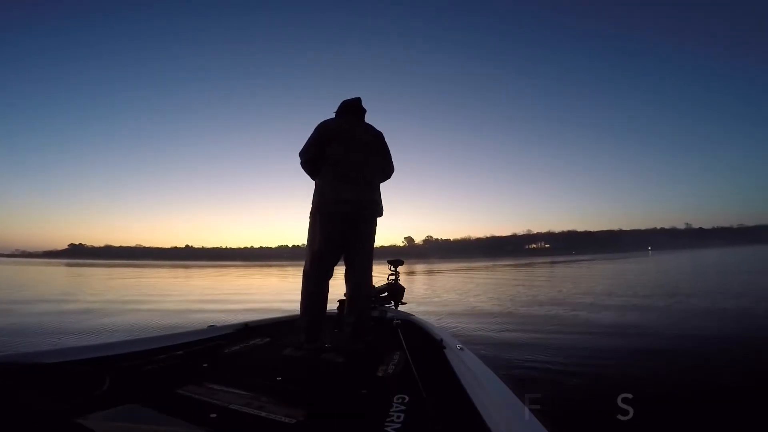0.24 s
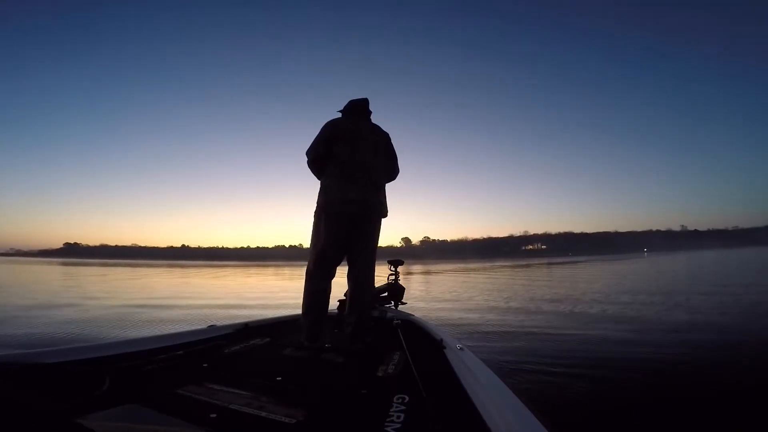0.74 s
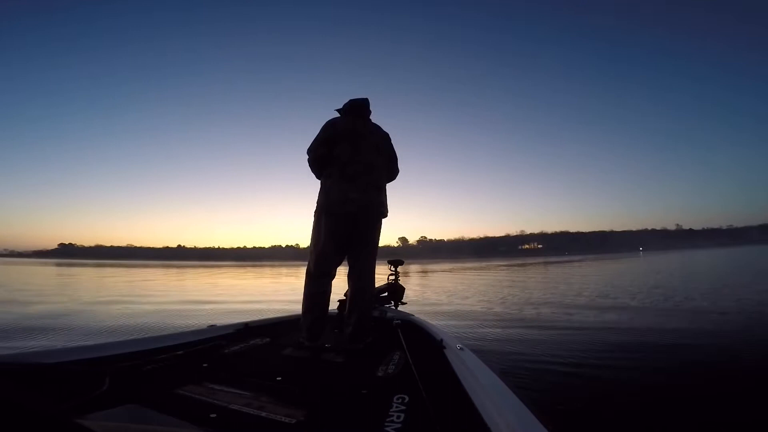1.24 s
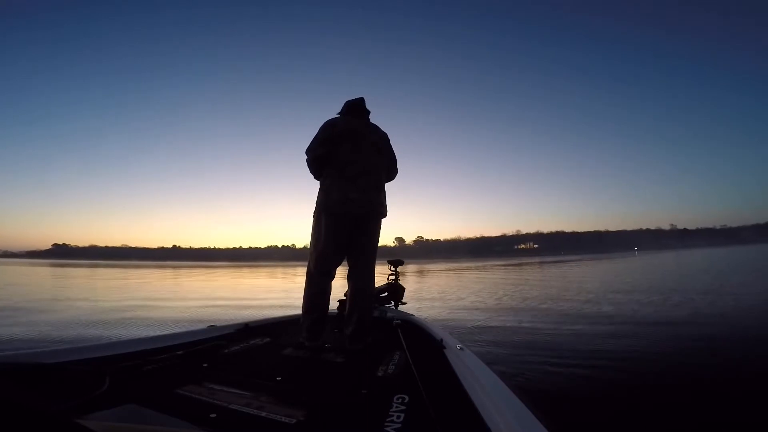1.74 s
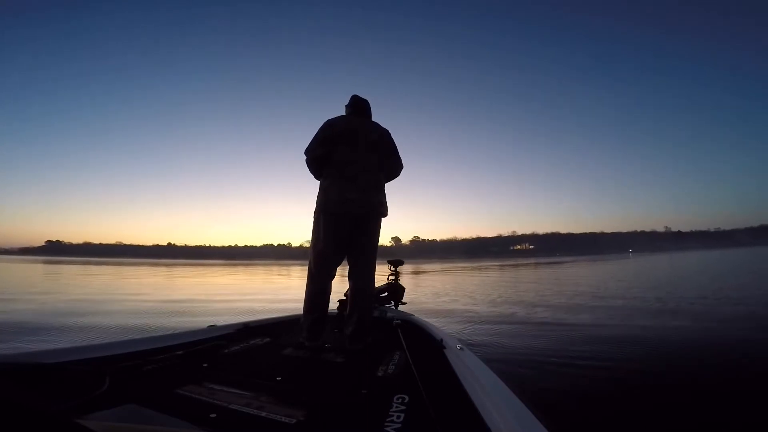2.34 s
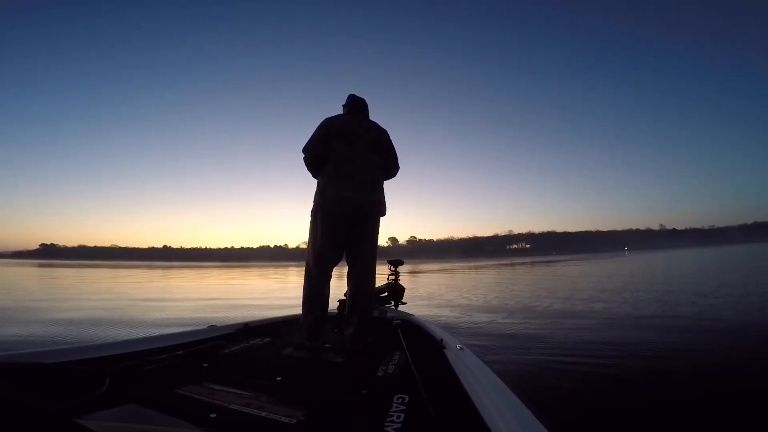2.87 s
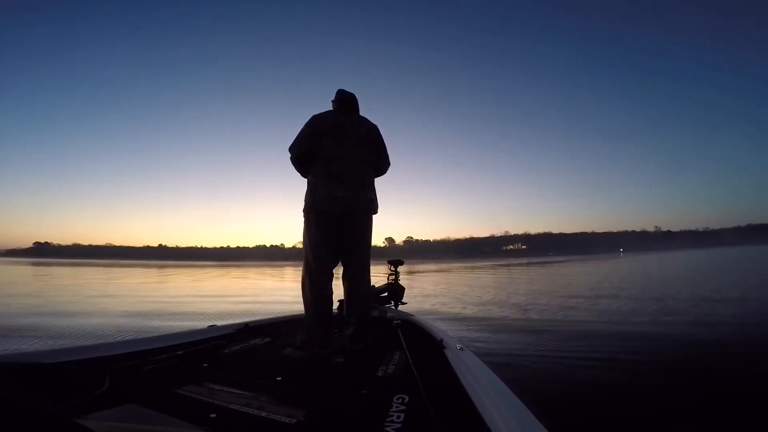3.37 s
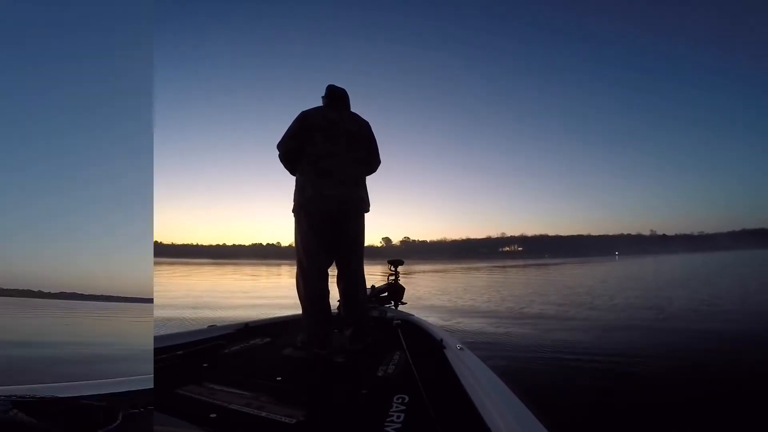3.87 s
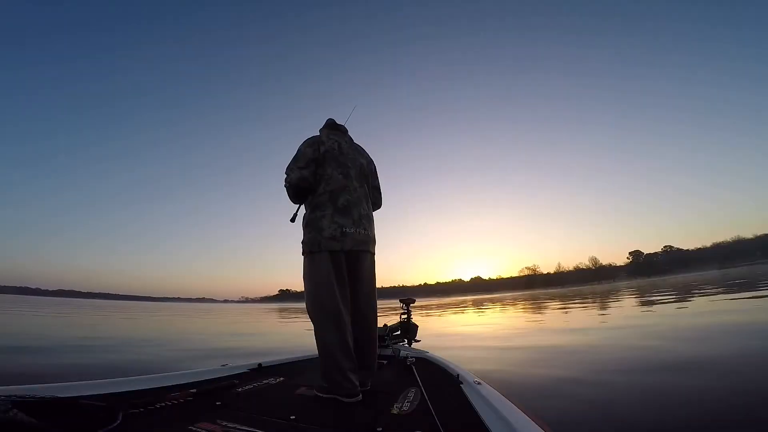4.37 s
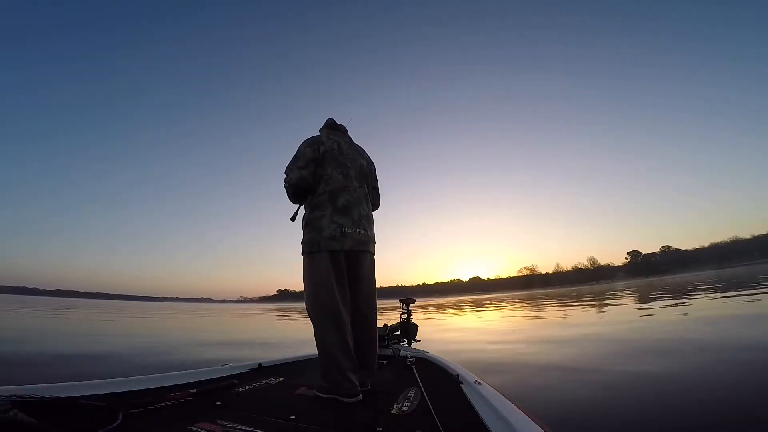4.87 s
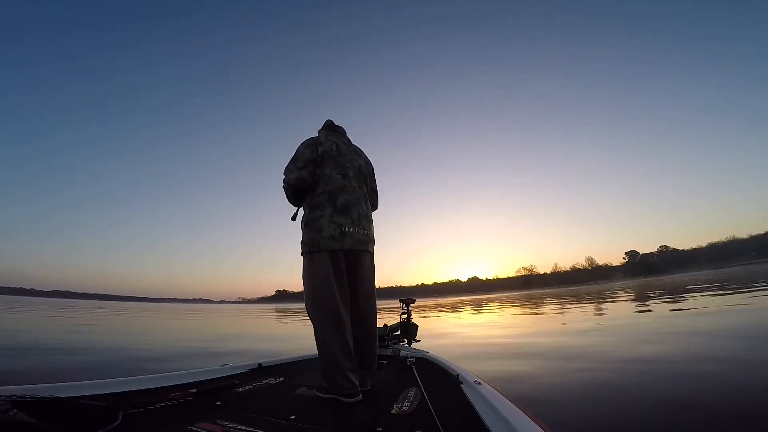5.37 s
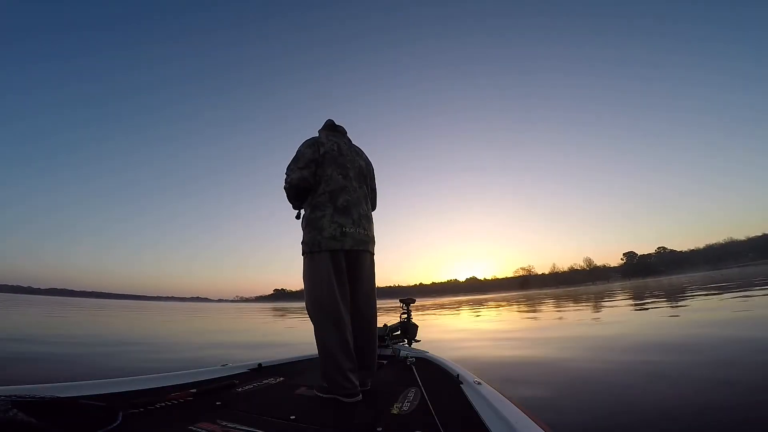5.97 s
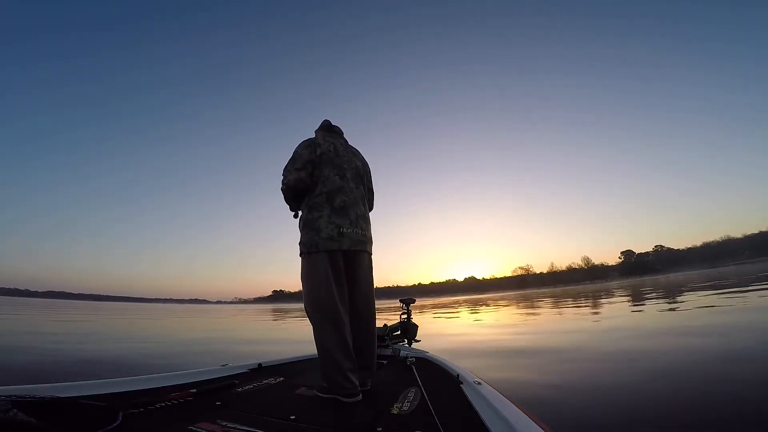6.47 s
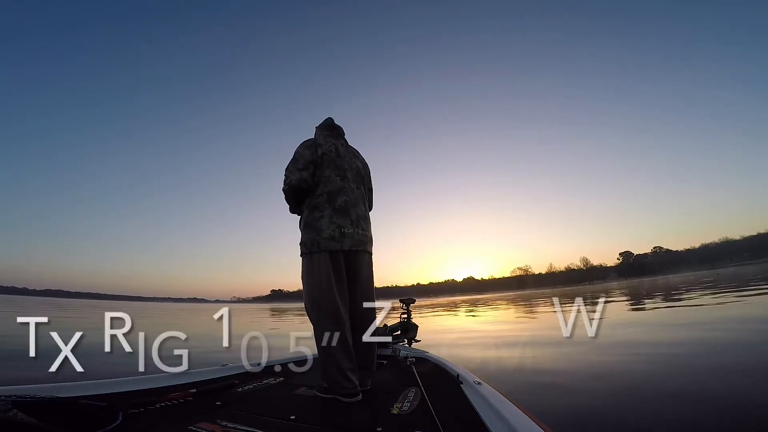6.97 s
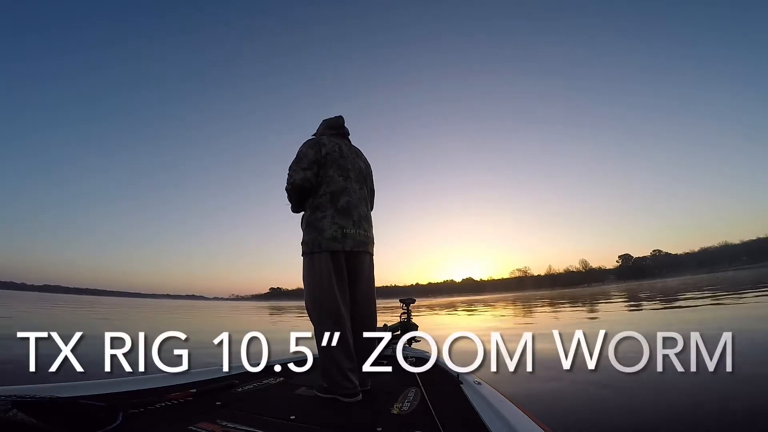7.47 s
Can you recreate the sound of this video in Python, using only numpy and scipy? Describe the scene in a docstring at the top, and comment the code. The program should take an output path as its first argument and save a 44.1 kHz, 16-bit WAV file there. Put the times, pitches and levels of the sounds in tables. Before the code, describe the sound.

An outdoor microphone on a boat picks up birds echoing from shoreline trees, soft air hiss and bumpy low wind gusts. Regular downward whistles, chips and upward sweeps fill the first part, with a few dull knocks and brief squeaks. The middle grows quiet, with an evenly repeated tiny chip and thin piping. The background then returns quickly with long arched whistles and stronger wind.

```python
"""Birds at dawn on a calm lake

Heard from a small boat: songbirds on the wooded shore, made of bending tones with scattered echoes.
A far chorus blurs many such notes; shaped noise makes the hiss and the rumble of wind on the microphone.
A faint hum is wavering tones, two squeaks are short rich tones and soft knocks are quickly dying tones.
Near the middle the background sinks into a quiet spell with sparser, softer song. Later the level
dips for an instant and the background comes back."""
import sys
import numpy as np
from scipy import signal
from scipy.fft import rfft, irfft, next_fast_len
from scipy.io import wavfile
from scipy.ndimage import uniform_filter1d

SR = 44100
rng = np.random.default_rng(int(sys.argv[2]) if len(sys.argv) > 2 else 0)


def store_pcm(level_fs):
    """Save levels as 16-bit WAV."""
    pcm = np.round(np.clip(level_fs, -1, 1) * 32767).astype(np.int16)
    wavfile.write(sys.argv[1], SR, np.atleast_2d(pcm).T)


N = 340011  # length [samples]
TIME = np.arange(N) / SR

# the air's hiss and murmur, early and late: (frequency [Hz], relative level [dB])
AIR_EARLY = [(20, 16), (70, 18.5), (130, 14), (200, 6.5), (300, 1), (450, -3), (730, -4), (1250, -9),
             (1800, -9), (2400, -7), (3000, -11), (4500, -13.5), (8000, -19), (15000, -23.5)]
AIR_LATE = [(20, 16), (70, 19), (130, 17), (200, 7), (300, 0.5), (450, -2), (800, -6), (1300, -8.5),
            (2300, -10.5), (3200, -12), (4500, -13.5), (8000, -19), (15000, -23.5)]
# wavering hum tones, early and late: (pitch [Hz], pitch wander [Hz], level above AIR_DB [dB])
HUM_EARLY = [(132.9, 12, 6.5), (247, 4.1, 1.5), (275.4, 3.9, -3.5)]
HUM_LATE = [(72.7, 3.04, 13), (101.4, 8, 11), (178.7, 6.6, 2), (238.1, 4.02, 5.5), (295.6, 5.25, -10.5)]
# color of the wind rumble: (frequency [Hz], relative level [dB])
WIND_SPECTRUM = [(10, 3), (22, 0.5), (32, 7), (50, -4.5), (75, -9.5), (110, -20), (170, -40), (300, -42.5),
                 (800, -74), (4000, -100)]
# gusts on the microphone: (time of the height [s], length [s], level [dB])
GUSTS = [(0.172, 0.045, -31), (0.367, 0.11, -32), (0.568, 0.044, -27), (0.795, 0.039, -29.5),
         (1.01, 0.06, -26.5), (1.125, 0.091, -23), (1.282, .15, -24), (1.489, 0.074, -23.5),
         (1.639, 0.044, -19.5), (1.745, 0.12, -24.5), (2.01, .1, -31), (2.284, .18, -32),
         (2.65, 0.087, -32), (2.745, .06, -32), (2.987, 0.073, -26.5), (3.772, 0.17, -33),
         (4.347, 0.11, -39.5), (5.757, 0.03, -38), (6.128, 0.036, -39), (6.727, 0.032, -29.5),
         (7.1, 0.17, -29), (7.306, 0.035, -20.5), (7.464, 0.15, -23), (7.656, 0.051, -28)]
# soft knocks on the hull: (time [s], pitch [Hz], level [dB], time to die by 60 dB [s])
KNOCKS = [(.283, 474, -50, .06), (1.607, 151, -26, 0.052), (3.099, 328, -36, 0.05),
          (3.655, 717, -45.5, 0.057)]
# short squeaks on the boat: (time [s], pitch [Hz], level [dB])
SQUEAKS = [(0.9076, 796, -40.5), (3.4829, 800, -40.5)]
# overtones of a squeak: (multiple of its pitch, relative level [dB])
SQUEAK_TONE = [(1, -0.5), (2, -2.5), (3, -3), (4, -13), (5, -16)]
# bend of each kind of note, evenly spaced from start to end: (distance from its pitch [semitones])
SLUR_BEND = [-0.2, -1.0, -3.0, -4.5, -6]
CHIP_BEND = [-2.01, -0.383, 0.14]
DROP_BEND = [0, -2.2, -7]
ARCH_BEND = [-0.993, 0, -0.1, -0.5, -0.9, -1.4]
SWEEP_BEND = [-9, -8, -4.5, 1]
# falling slurs (the main song), rising chips, steep drops, upward sweeps and arched whistles:
# (time [s], length [s], pitch [Hz], level [dB])
SLURS = [(.442, 0.12, 2545, -56.5), (.955, .125, 2506, -57), (1.418, 0.13, 2486, -56),
         (1.87, .118, 2550, -54), (2.303, .115, 2384, -55.5), (2.335, .105, 2490, -56),
         (2.718, .118, 2410, -56.5), (2.8, 0.1, 2546, -56.5), (3.11, 0.11, 2436, -57.5),
         (3.515, .13, 2350, -62), (3.925, .12, 2370, -67)]
CHIPS = [(1.11, 0.044, 2480, -57.5), (1.635, 0.05, 3130, -60), (2.04, 0.076, 3080, -61),
         (1.848, 0.037, 2540, -58), (3.515, .035, 2820, -58), (3.886, .022, 3020, -61.5),
         (4.035, 0.052, 2370, -66), (4.415, 0.046, 1820, -74), (4.68, .045, 3090, -74),
         (4.832, .035, 2830, -73), (5.11, .06, 2880, -75), (5.153, .054, 2105, -68.5),
         (5.402, .024, 2770, -71), (5.402, .025, 2090, -73), (5.685, 0.027, 2780, -70),
         (5.985, .024, 2780, -68), (6.841, .03, 2420, -56), (6.974, .024, 4770, -62),
         (6.976, 0.042, 3310, -59), (7.255, 0.021, 2340, -58), (7.66, 0.023, 2430, -58)]
DROPS = [(.325, .04, 2730, -57.5), (4.215, 0.063, 3950, -74), (4.262, .024, 3200, -69),
         (4.575, .075, 3970, -76), (6.228, .065, 2900, -73), (7.24, 0.021, 3100, -58),
         (7.638, 0.021, 3220, -58)]
SWEEPS = [(2.745, 0.09, 3450, -61), (3.005, .1, 3250, -60), (3.27, .1, 3430, -59.5), (3.51, .11, 3130, -62),
          (3.745, .12, 3070, -67)]
ARCHES = [(.22, 0.075, 2520, -56.5), (3.335, 0.097, 2470, -59), (3.54, 0.13, 2435, -58),
          (3.775, .07, 2460, -59), (4.005, .06, 2780, -68), (4.998, .27, 3236, -69),
          (6.978, 0.29, 3300, -61.5), (7.015, .26, 2505, -61), (7.25, 0.28, 3660, -63.5)]
# one small low chip sung in a row: (first time [s], length [s], pitch [Hz], level [dB])
CHIP_RUN = (4.182, 0.02, 2360, -72)
# piping notes: (time [s], length [s], pitch [Hz], level [dB], starting offset in pitch [semitones])
PIPES = [(0.659, 0.068, 2420, -63, 0), (3.013, .037, 3370, -59, 0.5), (3.15, .17, 3830, -65, -0.5),
         (5.405, .078, 3660, -68, 3), (5.53, 0.1, 3135, -68.5, .4), (5.703, 0.034, 2310, -66.5, 0),
         (6.275, .06, 1880, -72, 2.4), (6.373, 0.11, 2810, -67.5, 2), (6.48, .048, 2786, -63, 0.7),
         (6.676, .032, 2880, -63, 2), (6.73, .04, 3020, -63, 2), (6.914, 0.057, 1535, -63, 0),
         (7.564, 0.033, 1690, -59, 0)]
# a rolling phrase of five notes:
# (delay [s], length [s], start [Hz], middle [Hz], end [Hz], level relative to the phrase [dB])
PHRASE = [(0, 0.021, 2845, 2520, 2250, -2.5), (0.036, 0.028, 2660, 2786, 2880, 0),
          (0.09, .072, 2180, 2043, 1860, -7.5), (.226, .032, 2190, 2430, 2650, -5),
          (0.284, .042, 3374, 3290, 2850, -3)]
# each singing of that phrase: (time [s], level [dB])
PHRASES = [(1.622, -55.5), (2.02, -53), (2.415, -52.5), (2.81, -58.5)]
# the brief dip in level: (time [s], half width [s], depth [dB])
DIP = (6.471, 0.0086, -24)

AIR_DB, BREEZE_DB = -59.5, -38  # base levels of the background and of the light breeze
CHANGE_S, CHANGE_TAKES_S = 4.05, 0.33  # middle and length of the fade from early to late background
SINK_S, SINK_TAKES_S = 3.76, 0.45  # the quiet spell sets in
LIFT_S, LIFT_TAKES_S = 6.475, 0.099  # the quiet spell lifts
CHIP_PERIOD_S = 0.127  # from one chip of the run to the next
SLIDE_S = 0.018  # time constant of a piping note settling onto its pitch
ARCH_FADE_DB = -5  # arched whistles start strong and fade by this much
EDGE_HZ = 15350  # upper limit of the sound


def gain_of(db):
    """Turns decibels into a factor on the sound wave."""
    return 10 ** (np.asarray(db) / 20)


def evened(x):
    """Scales a sound to an average strength (rms) of 1."""
    return x / np.sqrt(np.mean(x ** 2) + 1e-20)


def read(points, hz):
    """Reads a spectrum, joining its points by straight lines over log frequency."""
    f, value = np.transpose(points)
    return np.interp(np.log(hz + 1), np.log(f + 1), value)


def add(mix, s, sound):
    """Mixes a sound in at time s."""
    part = mix[max(round(s * SR), 0):][:len(sound)]
    part += sound[:len(part)]


def noise(shape):
    """Noise of rms 1, colored by multiplying each frequency by shape(Hz)."""
    size = next_fast_len(N)
    spectrum = rfft(rng.standard_normal(size))
    colored = irfft(spectrum * shape(np.fft.rfftfreq(size, 1 / SR)), size)
    return evened(colored[:N])


def drift(rate_hz):
    """A random wander of rms 1, with little movement faster than about rate_hz."""
    return noise(lambda f: np.exp(-(f / rate_hz) ** 2))


def whistle(length, pitches, waver, edge=0.00727):
    """A nearly pure tone that bends smoothly through evenly spaced pitches, with soft ends."""
    t = np.arange(-edge / 2, length + edge / 2, 1 / SR)
    places = np.linspace(0, 1, len(pitches))
    curve = np.polyfit(places, pitches, len(pitches) - 1)
    hz = np.polyval(curve, t / length)
    turns = np.cumsum(hz * (1 + waver[:len(t)])) / SR
    swell = signal.windows.tukey(len(t), min(1, 0.082 + 1.5 * edge / length))
    return np.sqrt(2) * swell * np.sin(2 * np.pi * turns)


def shore(x, t60, delay=0.012):
    """Trees on the shore scatter sound into many random echoes that die by 60 dB in t60 seconds."""
    t = np.arange(SR) / SR
    hits = rng.random(SR) < 2000 / SR  # about 2000 echoes a second
    taps = rng.standard_normal(SR) * hits * (t > delay)
    tail = taps * gain_of(-60 * t / t60)
    return signal.fftconvolve(x, tail / np.linalg.norm(tail))[:N]


def spell(depth_db):
    """Gain of a background layer: it sinks slowly into the quiet spell and returns quickly."""
    sinking = np.clip((TIME - SINK_S) / SINK_TAKES_S, 0, 1)
    lifting = np.clip((TIME - LIFT_S) / LIFT_TAKES_S, 0, 1)
    return gain_of(depth_db * (sinking - lifting))


def air(spectrum, level_db, patchy_db):
    """Wide hiss with a low murmur: noise whose strength varies in faint patches of time and pitch."""
    hz, _, z = signal.stft(rng.standard_normal(N), SR, nperseg=2048, noverlap=1536)
    patches = uniform_filter1d(rng.standard_normal(z.shape), size=20, axis=0)
    patches = evened(uniform_filter1d(patches, size=8, axis=1))
    z = z * gain_of(read(spectrum, hz)[:, None] + patchy_db * patches)
    hiss = signal.istft(z, nperseg=2048, noverlap=1536)[1][:N]
    return gain_of(level_db) * evened(hiss)


def hum(lines, waver=0.22):
    """Faint motor-like tones that waver in pitch and strength."""
    out = np.zeros(N)
    for hz, width, db in lines:
        turns = np.cumsum(hz + width / 2 * drift(4.81)) / SR
        tone = (1 + waver * drift(2.7)) * np.sin(2 * np.pi * turns)
        out += gain_of(db) * evened(tone)
    return out


def chorus(centre_hz, spread, glide, level_db, count):
    """Many far birds: short arched or gliding notes, blurred together by the woods."""
    song, wander = np.zeros(N), 0.011 * drift(120)
    for k, (when, long, size, pitch, slope) in enumerate(rng.random((count, 5))):
        hz = centre_hz * (1 + spread * (2 * pitch - 1))
        bend = glide * (2 * slope - 0.8)
        pitches = [hz * (0.97 + bend), hz, hz * (0.97 - bend)]
        note = whistle(0.02485 + 0.05 * long, pitches, wander)
        start = (k + when) / count * N / SR  # one note at random in each equal slice of time
        add(song, start, gain_of(5 * size) * note)
    return gain_of(level_db) * evened(song + 0.8 * shore(song, t60=0.4))


def wind(steady_s=0.075, fickle_db=2.0):
    """Eddies buffet the microphone: a fickle light breeze, with gusts that swell and die away."""
    eddies = noise(lambda f: gain_of(read(WIND_SPECTRUM, f)) * (1 - np.exp(-(f / 12) ** 2)))
    # level out the eddies, so that breeze and gusts set their strength
    power = uniform_filter1d(eddies ** 2, size=round(steady_s * SR))
    eddies = eddies / np.sqrt(power + 1e-9)
    breeze = gain_of(BREEZE_DB + fickle_db * drift(10)) * spell(depth_db=-16.5)
    gust_power = np.zeros(N)
    for s, length, db in GUSTS:
        gust_power += gain_of(db) ** 2 * np.exp(-(2 * (TIME - s) / length) ** 2)
    return np.sqrt(breeze ** 2 + gust_power) * eddies


def knocks(rise=0.004):
    """Dull thuds of the hull: low to middling tones that die away quickly."""
    out, t = np.zeros(N), np.arange(SR // 4) / SR
    for s, hz, db, t60 in KNOCKS:
        swell = 1 - np.exp(-(t / rise) ** 2)
        add(out, s, gain_of(db - 60 * t / t60) * swell * 2 * np.sin(2 * np.pi * hz * t))
    return out


def squeaks(hold=0.012, rise=0.00028):
    """A few quick, even cycles rich in overtones that stop almost at once."""
    out, t = np.zeros(N), np.arange(SR // 30) / SR
    swell = (1 - np.exp(-t / rise)) * np.exp(-(t / hold) ** 4)
    for s, hz, db in SQUEAKS:
        tone = sum(gain_of(part_db) * np.cos(2 * np.pi * multiple * hz * t)
                   for multiple, part_db in SQUEAK_TONE)
        add(out, s, gain_of(db) * evened(tone) * swell)
    return out


def repeated(first, length, hz, db, count):
    """One chip sung again and again at an even pace."""
    return [(first + k * CHIP_PERIOD_S, length, hz, db) for k in range(count)]


def notes():
    """Every nearer note as (time [s], length [s], pitches [Hz], level [dB], fade [dB]), bent by its kind."""
    kinds = [(SLURS, SLUR_BEND, 0), (CHIPS, CHIP_BEND, 0), (repeated(*CHIP_RUN, count=8), CHIP_BEND, 0),
             (DROPS, DROP_BEND, 0), (SWEEPS, SWEEP_BEND, 0), (ARCHES, ARCH_BEND, ARCH_FADE_DB)]
    for rows, bend, fade_db in kinds:
        for s, length, hz, db in rows:
            yield s, length, hz * 2 ** (np.array(bend) / 12), db, fade_db
    for s, length, hz, db, slide in PIPES:
        bend = slide * np.exp(-np.linspace(0, length, 7) / SLIDE_S)
        yield s, length, hz * 2 ** (bend / 12), db, 0
    for s, db in PHRASES:
        for delay, length, *pitches, note_db in PHRASE:
            yield s + delay, length, pitches, db + note_db, 0


def birds(waver=0.0053, flutter_db=1.64, near_echo_db=-12, far_echo_db=-11.0):
    """Nearer singers: the long path over water makes notes flutter; branches and woods echo them."""
    song, wander = np.zeros(N), waver * drift(140)
    for s, length, pitches, db, fade_db in notes():
        note = whistle(length, pitches, np.roll(wander, -round(s * SR)))
        fade = np.linspace(0, fade_db, len(note))
        add(song, s - 0.003, gain_of(db + fade) * note)  # a little early, for the soft start
    song *= gain_of(flutter_db * drift(55))
    branches = shore(song, t60=0.045, delay=0.0037)
    woods = shore(song, t60=0.84, delay=0.028)
    return song + gain_of(near_echo_db) * branches + gain_of(far_echo_db) * woods


def scene():
    """Air, far chorus and hum change color and sink for a while; wind, boat sounds and birds join them."""
    change = np.clip((TIME - CHANGE_S) / CHANGE_TAKES_S + 0.5, 0, 1)
    early, late = np.sqrt(1 - change), np.sqrt(change)
    # each far chorus joins a narrow band of pitches with a wide one
    far_early = (chorus(2450, 0.0422, 0.038, level_db=-13.5, count=110)
                 + chorus(2150, 0.3, 0.1676, level_db=-5.5, count=170))
    far_late = (chorus(2330, 0.033, 0.06, level_db=-16, count=50)
                + chorus(2700, 0.36, 0.157, level_db=-4.0, count=150))
    air_early = air(AIR_EARLY, level_db=17.0, patchy_db=1.0)
    air_late = air(AIR_LATE, level_db=17.0, patchy_db=0.96)
    open_air = early * (air_early + far_early) + late * (air_late + far_late)
    drone = early * hum(HUM_EARLY) + late * hum(HUM_LATE)
    background = gain_of(AIR_DB) * (spell(depth_db=-11.5) * open_air + spell(depth_db=-14) * drone)
    return (background + wind() + knocks() + squeaks() + birds())[None]


def record(dry):
    """The level dips briefly; then a filter removes what lies above the upper limit."""
    s, width, db = DIP
    dip = gain_of(db / (1 + ((TIME - s) / width) ** 2))
    low_pass = signal.firwin(801, EDGE_HZ, window=("kaiser", 9), fs=SR)
    return signal.oaconvolve(dry * dip, low_pass[None], "same")


dry = scene()
out = record(dry)
store_pcm(out)
```